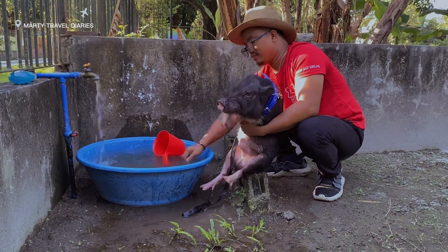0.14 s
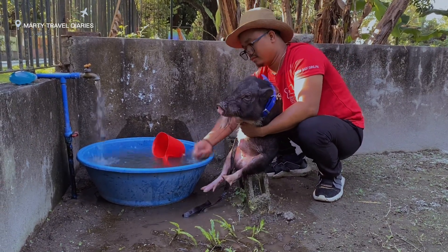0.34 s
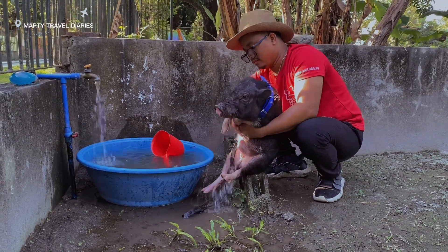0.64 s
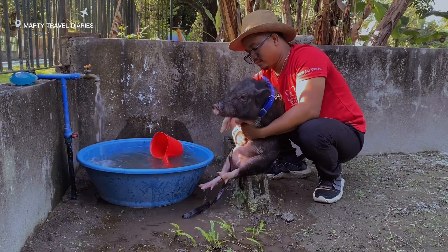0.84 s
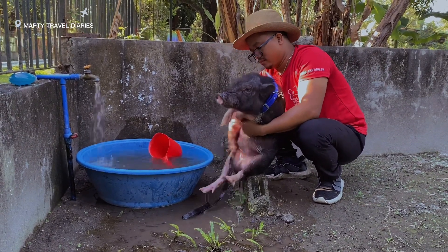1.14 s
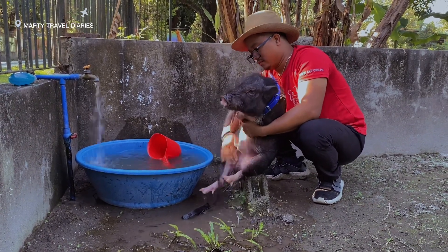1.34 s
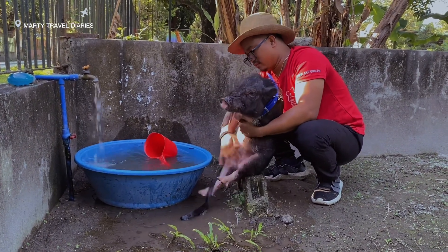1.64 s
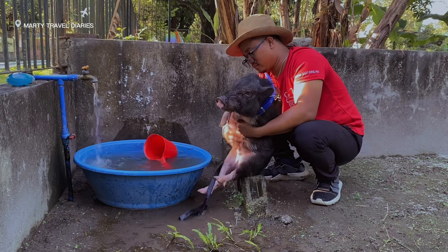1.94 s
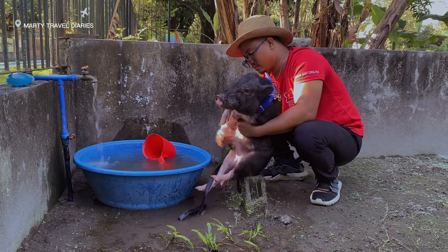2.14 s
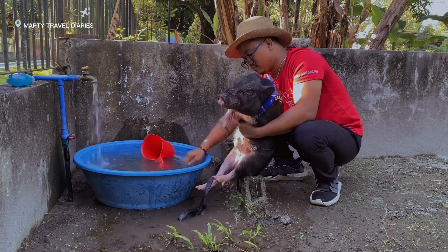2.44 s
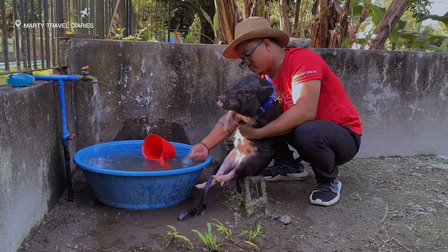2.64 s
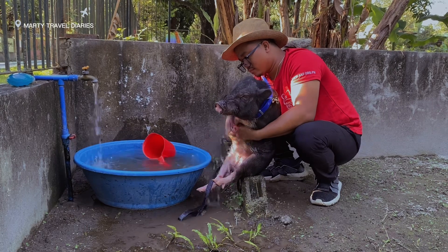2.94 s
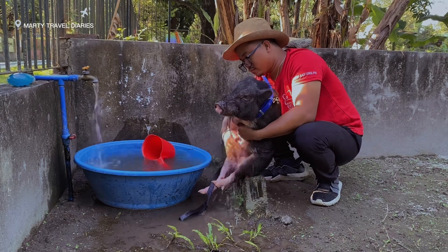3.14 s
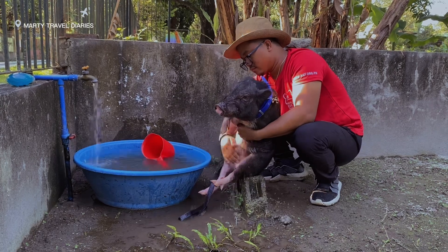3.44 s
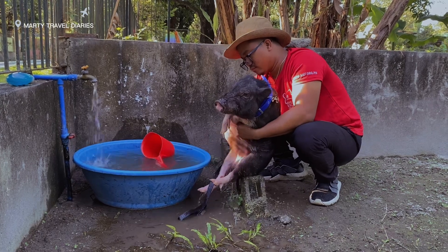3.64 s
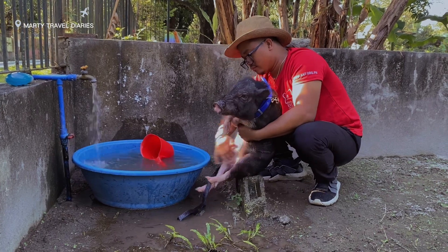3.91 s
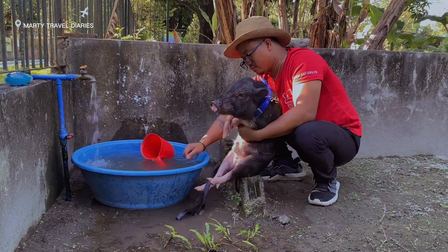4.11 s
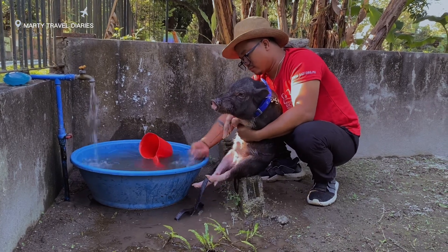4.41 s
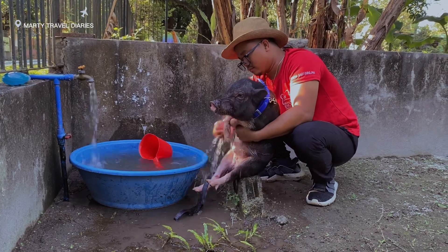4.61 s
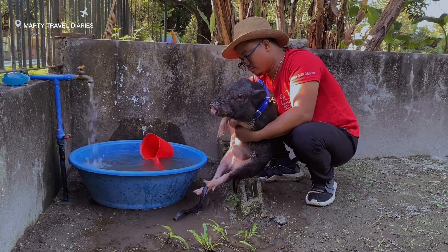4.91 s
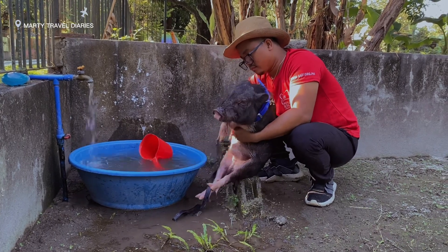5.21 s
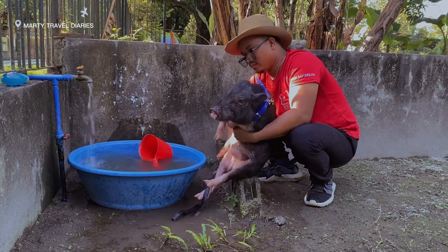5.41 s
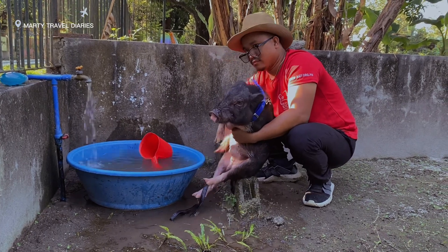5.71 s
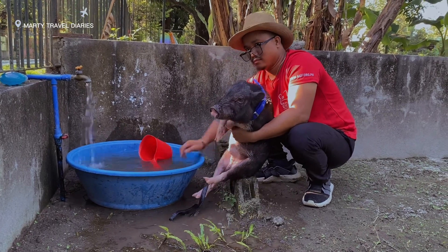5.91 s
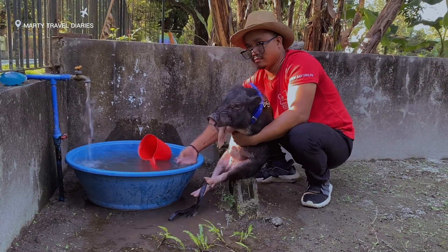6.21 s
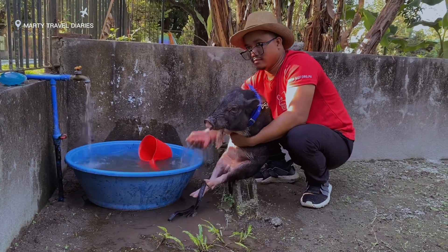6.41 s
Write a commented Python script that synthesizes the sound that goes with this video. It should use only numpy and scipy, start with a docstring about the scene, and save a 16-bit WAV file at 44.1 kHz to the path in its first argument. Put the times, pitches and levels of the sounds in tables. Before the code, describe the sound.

A piglet squeals in three long, raspy, wavering cries near the middle while a tap pours steadily into a water-filled basin outdoors.

```python
"""A yard with concrete walls close by: a piglet held beside a basin squeals in three long cries, near the middle.
The cry is a high wavering whine and hoarse breath, let out in about ninety bursts a second by a flutter in
the throat, then coloured by throat, snout and nostrils. A little to the left a tap pours into the basin: patchy
hiss, damped bubble tones and short spits of noise. Low rumble lies beneath, and a puff of wind thuds
on the two microphone ports."""
import sys
import numpy as np
from scipy import signal
from scipy.fft import rfft, irfft, next_fast_len
from scipy.io import wavfile
from scipy.ndimage import uniform_filter1d, map_coordinates

SR = 44100
rng = np.random.default_rng(int(sys.argv[2]) if len(sys.argv) > 2 else 0)


def wav_out(sig):
    """Save sig, one row per channel (or a flat mono array), as 16-bit PCM at SR to the path in sys.argv[1]."""
    wavfile.write(sys.argv[1], SR, np.round(np.clip(np.atleast_2d(sig).T, -1, 1) * 32767).astype(np.int16))


def volts(x):
    """Linear amplitude factor 10**(x/20) for a level x in dB, scalar or array-like."""
    e = np.asarray(x, float) / 20
    return 10 ** e


N = 289296  # length [samples]


def unit(x):
    """Scaled to rms 1."""
    return x / np.sqrt(np.mean(x ** 2) + 1e-20)


def levelled(x):
    """Divided by its own running rms over 6000 samples, so that loudness is set elsewhere."""
    return x / np.sqrt(np.abs(uniform_filter1d(x * x, size=6000)) + 1e-9)


def along(points, hz, order=1):
    """One column of a table over log frequency."""
    table = np.transpose(points)
    return np.interp(np.log(hz + 1), np.log(table[0] + 1), table[order])


def curves(rows):
    """One value per sample for each column after the time."""
    s, *columns = np.transpose(rows)
    return [np.interp(np.arange(N) / SR, s, column) for column in columns]


def wobble(rate):
    """A smooth random curve, rate knots a second."""
    return map_coordinates(rng.standard_normal(N // 8), [np.arange(N) * rate / SR])


def per_burst(beat):
    """A smooth random curve with one knot for each flutter cycle."""
    return map_coordinates(rng.standard_normal(N // 100), [beat])


def filtered(x, response):
    """x times a complex response of frequency."""
    m = next_fast_len(N + SR // 2)
    return irfft(rfft(x, m) * response(np.fft.rfftfreq(m, 1 / SR)), m)[..., :N]


def modes(table):
    """Causal response of parallel resonances with alternating sign: (centre [Hz], width [Hz], level [dB])."""
    def response(f):
        total = 0
        for k, (centre, width, db) in enumerate(table):
            damping = 1j * f * width
            total = total + (-1) ** k * volts(db) * damping / (centre ** 2 - f * f + damping)
        return total
    return response


def throat_flutter():
    """The folds part once a cycle: returns the count of cycles, the breath share and the opening."""
    # stretches where the whine is voiced; between them the cry is hoarse breath:
    # (start [s], end [s], breath share [0-1], leak between bursts [0-1], bursts [per s])
    voiced = [(0, .16, .4, .25, 93), (.355, .49, .45, .25, 93), (1.06, 1.14, .9, .15, 75),
              (1.14, 1.2, .7, .15, 90), (1.2, 1.34, .33, .15, 92.5), (1.34, 1.98, .17, .09, 93.2),
              (1.98, 2.37, .38, .07, 93.5), (2.37, 2.83, .5, .1, 87), (2.98, 3.3, .36, .16, 93.5),
              (3.3, 3.72, .45, .4, 95.5), (4.54, 4.705, .6, .25, 88), (4.705, 4.84, .6, .2, 87.5),
              (4.84, 4.95, .47, .2, 87.5), (4.95, 5.25, .45, .28, 90.5), (5.25, 5.39, .5, .55, 89.5),
              (5.39, 5.57, .45, .14, 92.5), (5.57, 5.85, .5, .4, 90.5), (5.85, 6.13, .4, .3, 92)]
    # strong and weak bursts alternate: (start [s], end [s], swing [dB])
    limp = [(1.98, 2.5, 2), (2.98, 3.3, 1.5)]
    t = np.arange(N) / SR
    hoarse = np.array([[.97], [.1], [92]])  # breath share, leak, bursts per s
    folds = np.repeat(hoarse, N, axis=1)
    for start, end, *row in voiced:
        folds[:, (t >= start) & (t < end)] = np.array(row)[:, None]
    voice_in_s = .03  # time the voice takes to set in
    breath, leak, rate = uniform_filter1d(folds, size=round(voice_in_s * SR), axis=1)
    breath = np.clip(breath, 0, 1)

    unevenness = .014 + .08 * breath ** 3  # timing unrest, greater when hoarse
    beat = np.cumsum(rate * (1 + unevenness * wobble(45))) / SR
    phase = beat % 1
    # quick opening, slower closing; the folds never shut fully
    opening = leak + (np.sin(np.pi * phase ** .85) ** 2) ** 2.7
    # they part again weakly late in each cycle
    opening = opening + .3 * np.abs(per_burst(beat)) * np.exp(-((phase - .85) / 0.15) ** 2)
    limp_db = sum(db * ((t >= start) & (t < end)) for start, end, db in limp)
    alternation = np.sin(np.pi * beat + .8 * wobble(8))
    scatter_db = 1.7 * per_burst(beat)
    return beat, breath, opening * volts(scatter_db + limp_db * alternation)


def whine_and_breath(beat, breath, hz):
    """Eleven harmonics of a trembling pitch, mixed with breath noise that pulses at that pitch."""
    # colour of the breath: (frequency [Hz], relative level [dB])
    air = [(600, -13.5), (850, -1), (1300, 11.5), (1750, 3.5), (2300, 2), (3000, 4), (3600, 1.5),
           (5000, 1.5), (8000, 5), (15000, 6)]
    # the whine sweeps within each burst, wanders from burst to burst and trembles
    sweep = 1.5 * np.sin(2 * np.pi * (beat % 1) + 1.2)
    wander = (.15 + .6 * breath) * per_burst(beat)
    tremble = (.25 + .8 * breath) * wobble(220)
    shake = .034  # pitch unrest as a share of the pitch
    turn = 2 * np.pi * np.cumsum(hz * (1 + shake * (sweep + wander + tremble))) / SR
    whine = 0
    for k in range(1, 12):
        whine = whine + volts(-2 * k + 0.99 * wobble(130)) * np.cos(k * turn) * (k * hz < 16000)

    puffs = filtered(rng.standard_normal(N) * (5.0 + np.cos(turn)), lambda f: volts(along(air, f)))
    # the folds clap once a burst
    snaps = np.diff(np.floor(beat - .4), prepend=-1)
    rough = unit(puffs + .5 * unit(snaps) * np.std(puffs))
    return np.sqrt(1 - breath) * unit(whine) + np.sqrt(breath) * rough, unit(puffs)


def nose_hollows(source):
    """Side cavities of the nose swallow narrow bands."""
    # (centre [Hz], width [Hz], gain at the centre [dB])
    hollows = [(1030, 110, -16), (1570, 70, -14), (2180, 190, -24), (2540, 200, -20), (3310, 110, -14),
               (4230, 300, -20)]

    def response(f):
        total = 1
        for centre, width, db in hollows:
            spring, damping = centre ** 2 - f * f, 1j * f * width
            total = total * (spring + damping * volts(db)) / (spring + damping)
        return total
    return filtered(source, response)


def throat_and_snout(source, rasp, beat, breath, mouth):
    """Resonances of throat, snout and nostrils, the last two louder as the mouth opens."""
    # resonances of the throat, the snout and the nostrils: (centre [Hz], width [Hz], relative level [dB])
    throat = [(820, 140, -3), (1160, 83, 3.5), (1383, 195, -0.5), (1710, 117, 8.5), (1883, 184, 10.5),
              (2006, 191, 11), (2450, 384, 2.5), (2812, 55, 9.5), (3037, 67, 10.5), (3482, 123, 9.5),
              (3707, 263, 4.5)]
    snout = [(4500, 200, -8), (4970, 280, 0), (5400, 300, -6), (5900, 350, -5)]
    nostrils = [(6910, 2800, -12), (6500, 40, 6), (7330, 306, -2), (8330, 910, -2.5), (10420, 980, -11),
                (15000, 1200, -24)]
    # the throat squirms: its resonances slide by about 1.2 % to either side
    squirm = .5 + .5 * np.tanh(wobble(5))
    raised = filtered(source, lambda f: modes(throat)(f * (1 - .012)))
    lowered = filtered(source, lambda f: modes(throat)(f * (1 + .012)))
    # effort alone sets the level, whichever overtone meets a resonance
    low = levelled(squirm * raised + (1 - squirm) * lowered)
    # slack folds growl low in the throat when the cry is hoarse
    growl = levelled(filtered(source, lambda f: modes([(806, 154, 0)])(f) ** 2))
    low = low + volts(-13) * breath ** 4 * growl

    # air rasping past the snout blurs its ring
    ring = filtered(source + .6 * rasp, lambda f: modes(snout)(f) / (1 + (4400 / (f + 1)) ** 16))
    hiss = filtered(source, lambda f: modes(nostrils)(f) / (1 + (5800 / (f + 1)) ** 8))
    ring_db = -24 + (-8.5 + 24) * mouth  # mouth shut to wide open
    hiss_db = -45 + (-2.5 + 45) * mouth
    hiss_db = hiss_db + 2 * per_burst(beat)  # spurts unevenly from burst to burst
    return low + volts(ring_db) * levelled(ring) + volts(hiss_db) * levelled(hiss)


def chest_throb(beat, breath, hz, cries):
    """The chest throbs at the flutter rate and twice and three times it, harder under a high whine."""
    t = np.arange(N) / SR
    inside_s, surge_s = 0.089, 0.048
    surge = 0
    for cry in cries:  # it surges just inside both ends of each table
        for moment in (cry[0][0] + inside_s, cry[-1][0] - inside_s):
            surge = surge + np.exp(-((t - moment) / surge_s) ** 2)
    level_db = -51 + 2 * np.log2(hz / 1400) + 2.5 * surge
    throb = np.sin(2 * np.pi * beat)
    throb = throb + (0.15 + 0.66 * breath) * np.sin(4 * np.pi * beat + 1.0)
    throb = throb + 0.41 * breath * np.sin(6 * np.pi * beat)
    return throb * volts(level_db + 5.2 * wobble(25))


def piglet():
    """Each flutter cycle lets out one burst of whine and breath through throat and snout."""
    # one table a cry, the first ending in its fading echo between the walls:
    # (time [s], level [dB], pitch the whine wavers about [Hz], mouth opening [0-1])
    cries = [
        [(0.0, -29.5, 1488, 0.93), (.04, -25, 1330, 0.55), (.09, -28, 1245, 0.88), (.15, -27.5, 1111, 0.5),
         (.25, -34, 1240, 0.34), (.355, -30, 1148, 0.62), (.39, -28, 1239, 0.79), (.435, -27.5, 1267, 0.64),
         (.48, -31.5, 1017, 0.7), (.52, -31.5, 1031, 0.1), (.6, -35.5, 996, 0.4), (.62, -45.5, 965.5, 0.97),
         (.66, -47.5, 947.6, 0.8), (.8, -59, 950, 0.3)],
        [(1.06, -70, 793, 0.3), (1.075, -44, 820, 0.3), (1.11, -52, 837, 0.4), (1.14, -44.5, 899.8, 0.8),
         (1.16, -35.5, 1213, 1), (1.19, -31, 1521, 1), (1.215, -25.5, 1736, 0.93), (1.29, -23.5, 1739, 0.84),
         (1.32, -30, 1593, 1), (1.345, -21, 1760, 0.77), (1.42, -22, 1844, 0.81), (1.55, -21.5, 1832, 0.79),
         (1.6, -19.5, 1770, 0.79), (1.8, -22, 1851, 0.81), (1.97, -21.5, 1876, 0.79), (2.05, -22.5, 1809, 0.79),
         (2.3, -22.5, 1752, 0.78), (2.45, -25.5, 1694, 0.88), (2.67, -26, 1495, 0.78), (2.76, -26, 1205, 0.65),
         (2.85, -32.5, 916.2, 0.2), (2.95, -30, 1002, 0.35), (3.0, -23.5, 1422, 0.75), (3.17, -23, 1437, 0.64),
         (3.25, -24.5, 1383, 0.69), (3.31, -23.5, 1320, 0.67), (3.36, -27.5, 1220, 0.45),
         (3.405, -25, 1119, 0.42), (3.45, -23, 1245, 0.51), (3.6, -27, 1214, 0.58), (3.69, -24, 1197, 0.47),
         (3.74, -30, 1187, 0.05), (3.805, -31, 1181, 0.5), (3.83, -50, 1173, 0.46), (3.86, -50, 1165, 0.23)],
        [(4.33, -47, 898.7, 0.1), (4.39, -50, 958.7, 0.2), (4.425, -39.5, 1040, 0.6), (4.47, -40.5, 1051, 0.55),
         (4.584, -30.5, 1128, 0.88), (4.705, -36, 1113, 0.88), (4.72, -28.5, 1406, 0.98),
         (4.92, -22, 1569, 0.86), (5.146, -24.5, 1497, 0.77), (5.255, -22, 1320, 0.74),
         (5.33, -21.5, 1548, 0.84), (5.45, -20, 1739, 0.83), (5.55, -23, 1651, 0.86), (5.65, -19.5, 1394, 0.72),
         (5.72, -20, 1632, 0.87), (5.8, -22, 1541, 0.76), (5.87, -21, 1776, 0.78), (5.94, -24, 1598, 0.72),
         (5.99, -21.5, 1406, 0.71), (6.07, -22.5, 1231, 0.54), (6.11, -29.5, 912, 0.6),
         (6.138, -39.5, 820, 0.8), (6.2, -46.5, 820, 0.7), (6.28, -51, 820, 0.5)],
    ]
    t = np.arange(N) / SR
    level_db, hz, mouth = curves(np.concatenate(cries))
    crying = sum((t >= cry[0][0]) & (t <= cry[-1][0]) for cry in cries)
    crying = uniform_filter1d(crying.astype(float), size=600)
    beat, breath, opening = throat_flutter()
    voice, puffs = whine_and_breath(beat, breath, hz)
    source = nose_hollows(opening * voice)
    cry = throat_and_snout(source, opening * puffs, beat, breath, mouth)
    return crying * volts(level_db) * cry, crying * chest_throb(beat, breath, hz, cries)


def bubbles(s, db, hz, turns, rise):
    """Damped tones, turns cycles per e-fold, whose pitch first climbs as each bubble nears the surface."""
    t = np.arange(SR // 20) / SR
    u = t * hz[:, None] / turns
    tone = np.sin(2 * np.pi * turns * u * (1 + rise * np.minimum(u, 2)))
    tone = volts(db)[:, None] * tone * np.exp(-u) * (1 - np.exp(-8 * u))
    where = (s * SR).astype(int)[:, None] + np.arange(len(t))
    return np.bincount(where.ravel(), tone.ravel(), N + SR)[:N]


def pouring_stream():
    """Patchy hiss and a crowd of 2000 small bubbles, in one colour and swaying in level."""
    # colour of the stream: (frequency [Hz], relative level [dB])
    pour = [(120, -66), (200, -8), (408, -10), (588, -13), (656, -18.5), (964, -17.5), (1900, -16),
            (2040, -15), (2360, -13), (3660, -17), (4400, -8.5), (8960, -21.5), (11200, -17), (15800, -26)]
    z = signal.stft(rng.standard_normal(N), nperseg=256)[2]
    patches = uniform_filter1d(rng.standard_normal(z.shape), size=24, axis=0)
    patches = uniform_filter1d(patches, size=3, axis=1)
    hiss = unit(signal.istft(z * volts(5 * unit(patches)), nperseg=256)[1][:N])
    moment, size, pitch = rng.random((2000, 3)).T
    size_db = -5 * np.log(size + .03)
    crowd = unit(bubbles(moment * N / SR, size_db, 600 * 13 ** pitch, turns=3.76, rise=0.094))
    stream = unit(filtered(hiss + 0.41 * crowd, lambda f: volts(along(pour, f))))
    return stream * volts(-48.5 + 1.2 * wobble(1.07) + 1.2 * wobble(14))


def drops():
    """Drops hitting the surface: short bright spits of noise, some placed and some in a random patter."""
    # drops placed one by one, from loud to barely there: (time [s], strength before the spit is shaped [dB])
    spits = [(0.704, -29), (0.747, -26.5), (0.772, -28), (0.858, -28), (0.901, -30), (0.958, -48),
             (0.984, -48), (1.075, -47), (1.1, -72), (3.869, -29), (3.917, -30), (4.007, -35), (4.057, -33),
             (4.125, -48), (4.171, -31), (4.227, -28), (4.272, -31), (4.304, -22.5), (4.312, -32),
             (4.352, -27.5), (6.166, -25.5), (6.23, -29), (6.255, -30), (6.361, -25), (6.408, -35),
             (6.465, -30), (6.502, -29)]
    s, db = np.transpose(spits)
    hits = np.bincount((s * SR).astype(int), volts(db), N)
    # the stream breaks into a patter of about 17 faint drops a second
    drips = np.diff(np.floor(np.cumsum(17 * (1 + .3 * wobble(20))) / SR), prepend=0) > 0
    hits = hits + drips * volts(-33 + 2 * rng.standard_normal(N))
    t = np.arange(1200) / SR
    envelope = np.exp(-t / .004) * (1 - np.exp(-t / .0008))
    noise = signal.fftconvolve(hits, envelope)[:N] * rng.standard_normal(N)
    return filtered(noise, modes([(4250, 2000, 0.61)]))


def tap():
    """The stream, its drops, and single bubbles placed one by one."""
    # big bubbles, small bubbles, and bubbles that whistle upward as they rise:
    # (time [s], strength before damping [dB], starting pitch [Hz])
    plops = [(0.597, -35, 283), (0.873, -33, 400), (1.415, -33, 507), (1.621, -38, 430), (1.718, -37, 527),
             (1.816, -32, 523), (2.559, -32.5, 420), (2.913, -39, 398), (3.381, -37.5, 484),
             (3.759, -32.5, 280), (3.904, -40, 480), (4.23, -29.5, 440), (4.304, -31, 426),
             (5.356, -34, 430), (5.475, -30.5, 387), (5.888, -27, 416), (5.958, -33, 395)]
    splashes = [(0.722, -27, 3120), (0.734, -28, 2760), (0.794, -39, 4370), (0.958, -38, 4150),
                (3.988, -34, 3470), (4.151, -36.5, 1270), (4.172, -34.5, 694), (4.189, -27.5, 3960),
                (4.274, -33, 1850), (4.3, -17.5, 1995), (4.312, -40, 785), (4.364, -29, 2270),
                (4.394, -33, 1400), (6.362, -31, 1890), (6.406, -39, 2110), (6.484, -42, 760),
                (6.502, -27.5, 3770), (6.516, -40.5, 740), (6.549, -32, 3580)]
    chirps = [(0.862, -44.5, 484), (4.236, -46, 494), (4.312, -42, 527)]
    water = pouring_stream() + drops()
    water = water + bubbles(*np.transpose(plops), turns=2.4, rise=0.025)
    water = water + bubbles(*np.transpose(splashes), turns=4.3, rise=0.048)
    return water + bubbles(*np.transpose(chirps), turns=15, rise=0.29)


def yard():
    """A low rumble of basin and far surroundings, nearly alike at both ports, and one puff of wind."""
    # colour of the rumble: (frequency [Hz], relative level [dB])
    rumble = [(15, -71.5), (25, -17), (54, 7.5), (140, 2), (246, 3.5), (300, -7), (390, -48), (660, -120)]
    pair = unit(filtered(rng.standard_normal((2, N)), lambda f: volts(along(rumble, f))))
    low = pair[0] + 0.048 * pair[1] * np.array([[1], [-1]])
    gust_s, gust_length_s = 5.606, 0.55
    swell = np.exp(-((np.arange(N) / SR - gust_s) / gust_length_s) ** 2)
    gust = unit(filtered(rng.standard_normal(N), modes([(44.78, 60, 0)]))) * swell
    return volts(-53) * low + volts(-50) * gust


def walls(x):
    """The concrete answers briefly, 130 samples late, with a different decaying noise at each port."""
    # (frequency [Hz], time to fall 60 dB [s], level [dB])
    echoes = [(300, .08, -16), (800, .07, -11), (1500, .06, -8), (3500, .06, -10), (5500, .06, -5),
              (6500, .05, -14), (12000, .05, -8)]
    hz, t, z = signal.stft(rng.standard_normal((2, SR // 4)), SR, nperseg=256)
    decay_db = -60 * t / along(echoes, hz)[:, None]
    tail = signal.istft(z * volts(decay_db), SR, nperseg=256)[1]
    tail = tail / np.linalg.norm(tail[0])
    wet = signal.fftconvolve(np.pad(x, (130, 0))[None], tail, axes=1)[:, :N]
    return filtered(wet, lambda f: volts(along(echoes, f, order=2)))


def scene():
    """Piglet near the middle, tap 1 dB to the left, walls and yard around them."""
    # the head turns: (time [s], left minus right [dB])
    lean = [(0, 1), (1.2, 1), (2.2, 0), (3.2, 0), (4.5, 0.2), (5.7, 0), (6.2, -.8)]
    side = np.array([[.5], [-.5]])
    cry, throb = piglet()
    water = tap()
    lean_db, = curves(lean)
    direct = cry * volts(lean_db * side) + throb + water * volts(side)
    return direct + walls(cry + 1.15 * water) + yard()


def top_cut(x):
    """Nothing passes above the cut-off."""
    return signal.sosfilt(signal.butter(12, 16790, fs=SR, output="sos"), x)


def record(dry):
    """The two microphone ports differ in phase and level from band to band, and stop at 15800 Hz."""
    # (frequency [Hz], phase by which the left leads [turns], left minus right [dB])
    ports = [(0, 0, 0), (600, .08, -1), (900, .08, 4), (1200, .05, -3), (1600, .06, 2), (2100, .08, -2),
             (3300, .13, 1.5), (4100, .12, -1), (4900, .2, 4), (5600, .2, 3), (6100, 0, 0), (7400, 0, 1.5),
             (8600, -.5, 0), (9300, -.5, 0), (10500, -1, 0), (11800, -1, 0), (12600, -1.5, 0),
             (13800, -1.5, 0), (14600, -2, 0)]
    hz, turns, db = np.transpose(ports)
    side = np.array([[.5], [-.5]])

    def port_response(f):
        lead = np.exp(2j * np.pi * side * np.interp(f, hz, turns))
        return lead * volts(side * np.interp(f, hz, db)) * (f < 15800)
    mix = filtered(dry, port_response)
    return top_cut(mix)


dry = scene()
out = record(dry)
wav_out(out)
```